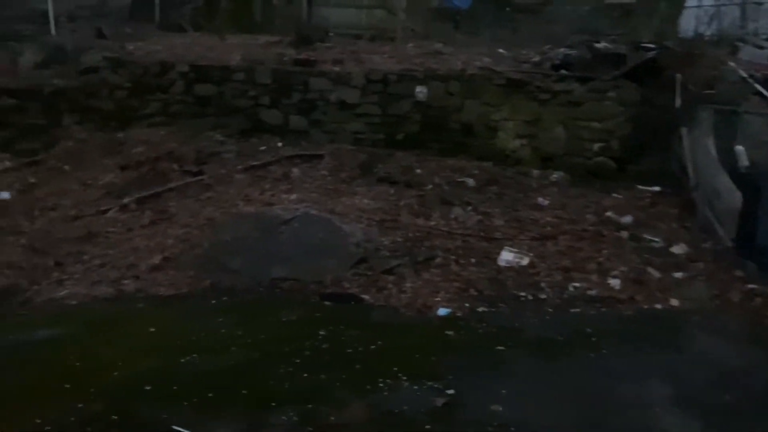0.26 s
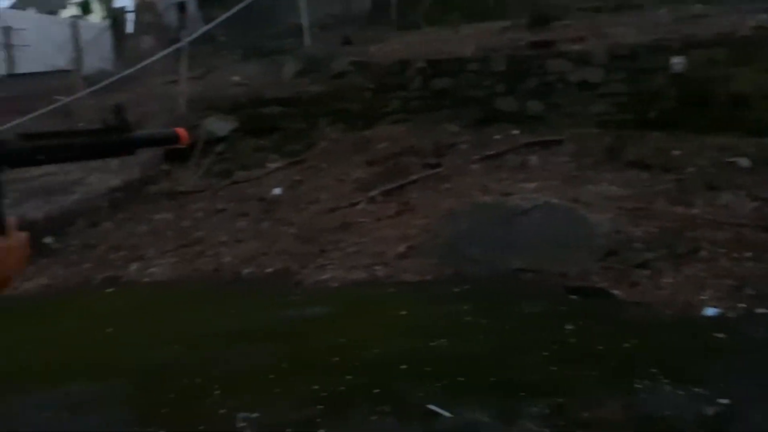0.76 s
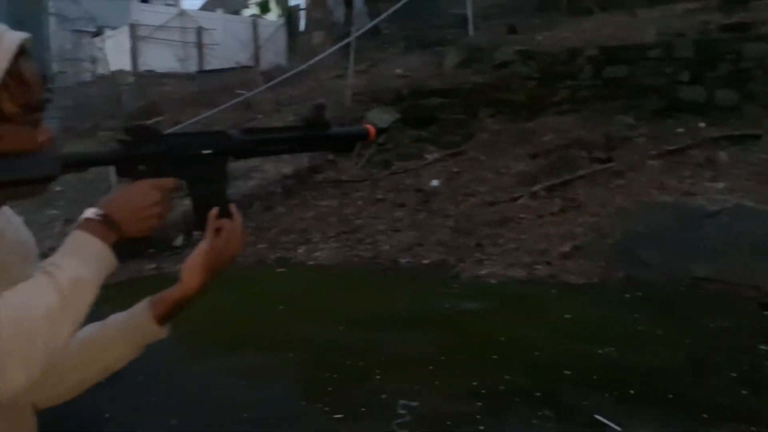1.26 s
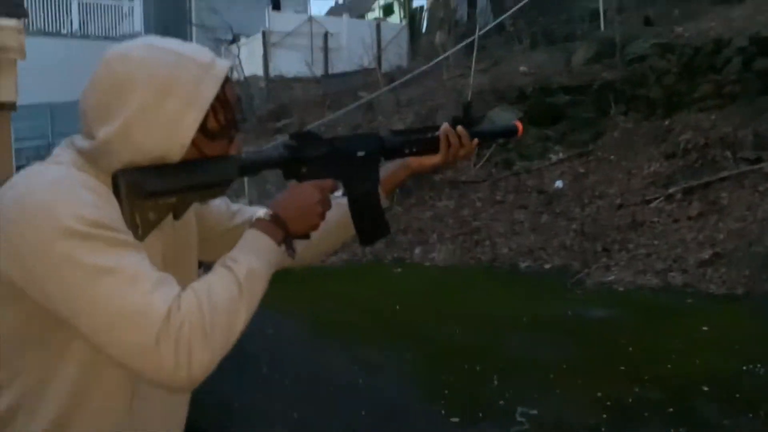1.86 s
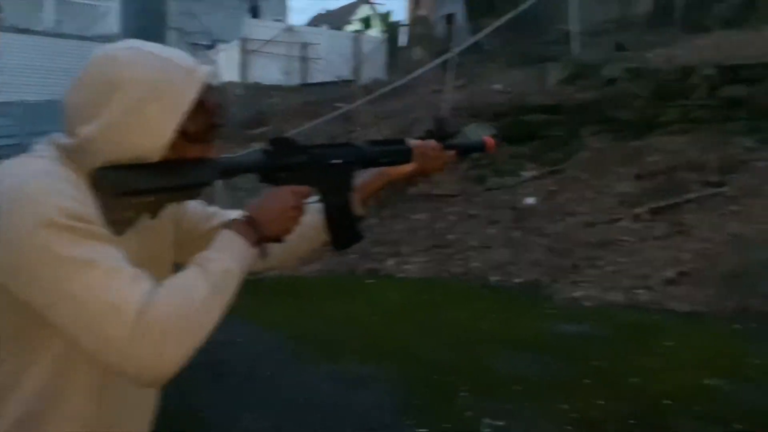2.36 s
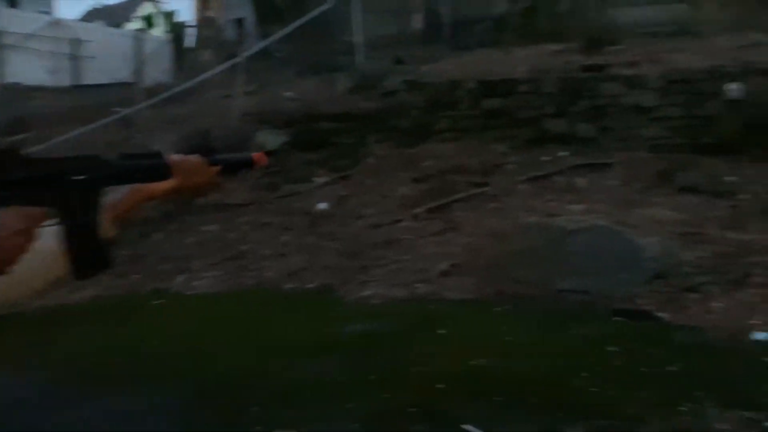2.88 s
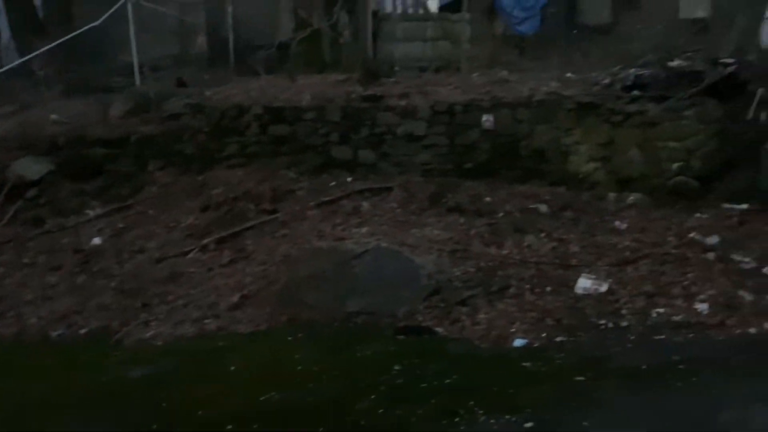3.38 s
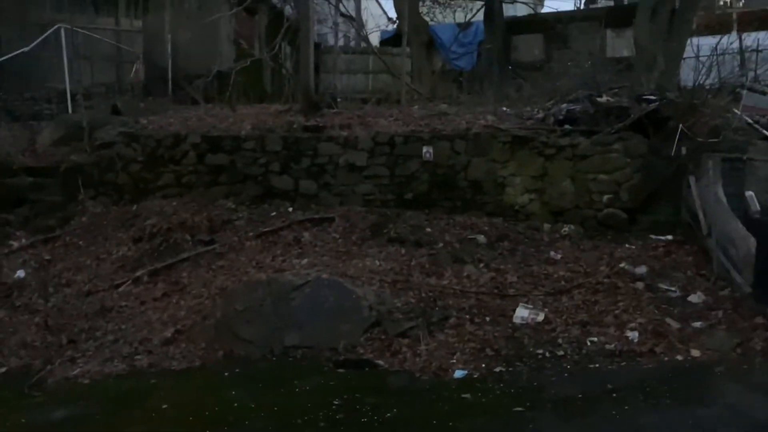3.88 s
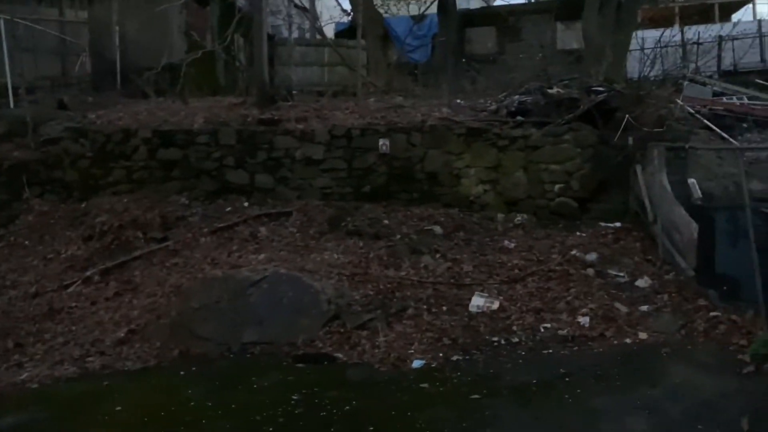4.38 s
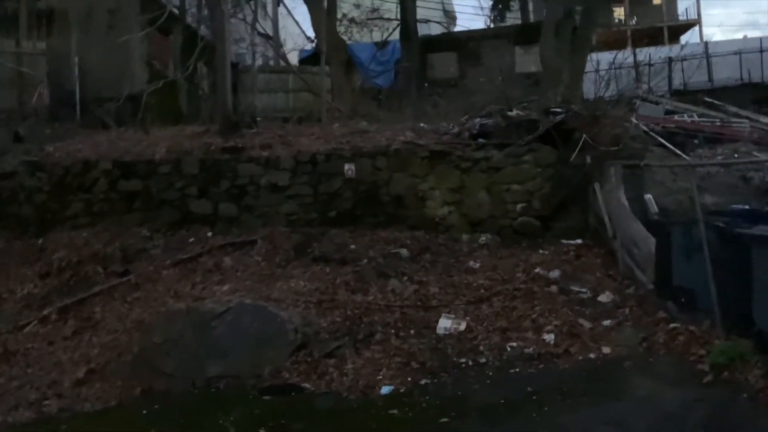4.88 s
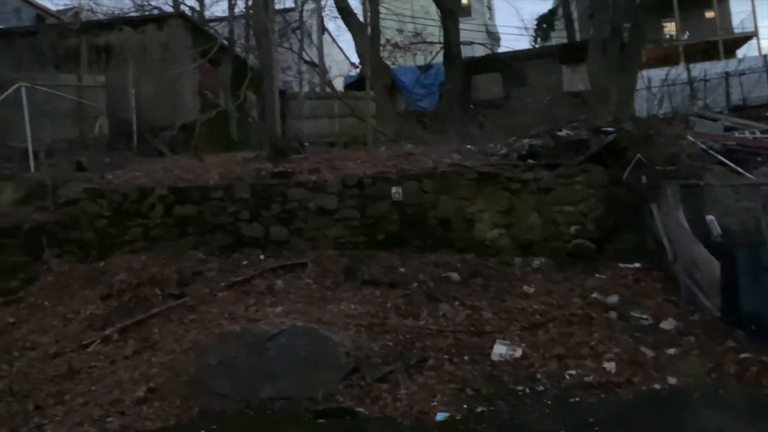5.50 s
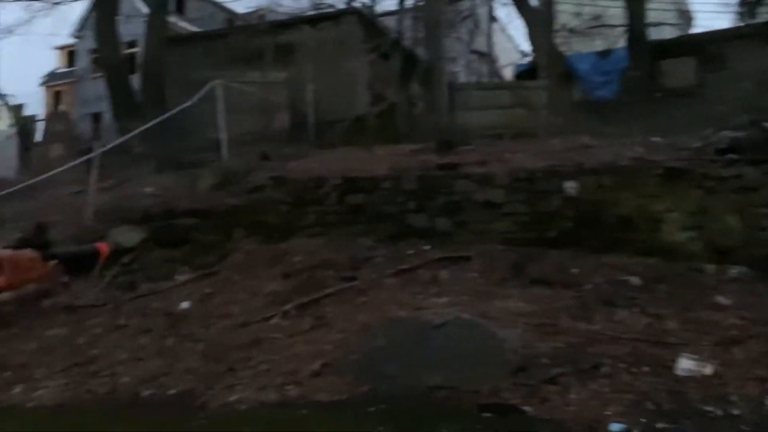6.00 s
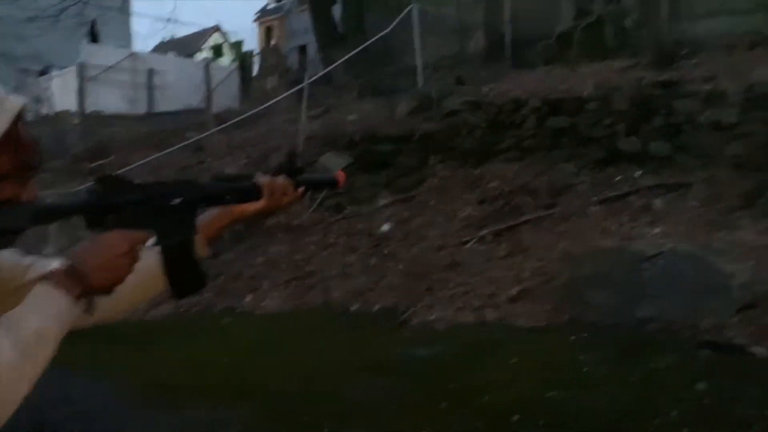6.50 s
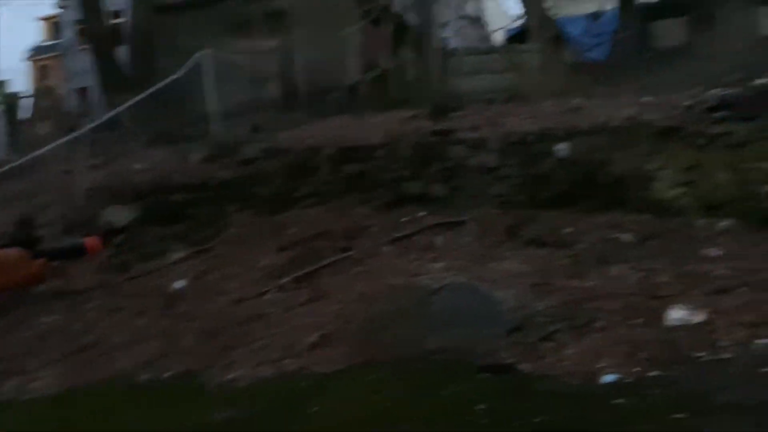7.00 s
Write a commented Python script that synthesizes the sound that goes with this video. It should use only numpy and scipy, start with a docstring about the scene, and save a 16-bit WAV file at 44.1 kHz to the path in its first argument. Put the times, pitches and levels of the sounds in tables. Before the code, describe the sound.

A close outdoor scene in a small yard, with faint low town rumble and light wind fluttering on the microphone. From about 0.1 to 1.4 seconds a magazine wheel is wound in four quick strokes, at roughly 0.1, 0.5, 0.85 and 1.2, each six to eight bright plastic clicks with a small shell ring, the last ending in a faint thud. A sleeve rustles softly near 1.7-1.9, and muffled bumps hit the microphone until 2.3. Five single shots follow at about 2.6, 2.8, 3.0, 3.2 and 3.4: short gear whir, hard clack, air puff, pellet tick about a tenth of a second later. Dull knocks and skittering ticks trail from 3.5 to 4.2. Quiet breeze remains, with a barely audible thin whistle and chirp around 5.5-5.8. At 6.14 the motor whirs again and three shots rattle out between 6.25 and 6.47, with brief reverberation, then calm to 7.2.

```python
"""An electric airsoft rifle in a back yard, a step from the microphone, in light wind before a distant town.
First a ratchet wheel on the magazine is wound in four strokes: tooth impacts ring its shell.
Handling then bumps the microphone, heard as damped low modes, and a sleeve rustles as filtered noise.
Five single shots follow, and later a burst of three: meshing gears whir and draw the spring, the piston
slams and air puffs out as noise bursts and body modes, and pellets tick on the far bank."""
import sys
import numpy as np
from scipy import signal
from scipy.fft import rfft, irfft, next_fast_len
from scipy.io import wavfile
from scipy.ndimage import uniform_filter1d

SR = 44100
rng = np.random.default_rng(int(sys.argv[2]) if len(sys.argv) > 2 else 0)


def wav_record(signal):
    """Record a signal, one row per channel, as 16-bit PCM in the file named by sys.argv[1]."""
    frames = np.transpose(np.atleast_2d(signal))
    bounded = np.clip(frames, -1, 1)
    # unit amplitude maps onto the largest positive 16-bit level
    quanta = np.round(bounded * 32767).astype(np.int16)
    wavfile.write(sys.argv[1], SR, quanta)


N = 319725
T = np.arange(N) / SR
SIZE = next_fast_len(N + SR)
FREQS = np.fft.rfftfreq(SIZE, 1 / SR)

# Levels in the tables are relative; each source sets its balance with offsets in dB.
# soft bumps on the microphone: t/s, level/dB
BUMPS = [(1.896, -34.5), (1.966, -25), (1.998, -31), (2.029, -31.5), (2.074, -24), (2.093, -22),
         (2.17, -28), (2.223, -24), (2.279, -29), (4.152, -31), (4.175, -33.5)]
# trigger pulls: motor on t/s, motor off t/s, run-up mesh f/Hz, rattle level/dB up to the first shot,
# rattle level/dB after it, motor tone level/dB under load, trigger click level/dB
PULLS = [(2.574, 2.682, 2150, -26.5, -27, -40.5, -23.5), (2.737, 2.865, 2051, -29.5, -28, -35.5, -23),
         (2.921, 3.063, 2168, -27, -32, -24.5, -26), (3.121, 3.268, 2202, -24, -35.5, -36.5, -42),
         (3.283, 3.447, 1829, -26.5, -30, -53.5, -42), (6.137, 6.513, 1858, -21.5, -22.5, -43.5, -35)]
# shots: t/s, clack level/dB, puff level/dB, piston travel/s, latch chatter level/dB, pellet strike level/dB
SHOTS = [(2.6254, -10, -8, 0.0051, -26.5, -43.5), (2.808, -8.5, -16, 0.0067, -29.5, -18.5),
         (3.0170, -9.5, -17.5, 0.0068, -34, -18.5), (3.2316, -10, -19, 0.0058, -34, -15.5),
         (3.4069, -9.5, -18.5, 0.0064, -31.5, -15), (6.2530, -9, -12.5, .0058, -19.5, -16.5),
         (6.3630, -11, -14.5, 0.0063, -22, -18), (6.4709, -10.5, -15.5, 0.008, -32.5, -7.5)]
# spectra of the spring's rasp, a pellet's tick and a dull knock: f/Hz, level/dB per Hz
SPRING_COLOUR = [(2000, -25.5), (5000, -11.5), (7500, -10), (9500, 8), (10500, 3.5), (12000, 7),
                 (14000, -7.5), (15800, -18.5)]
PELLET_COLOUR = [(500, -17.5), (2000, -12.5), (4500, -12.5), (7000, -11.5), (9500, -2.5), (11000, -4.5),
                 (13000, -2.5), (15800, -7.5)]
KNOCK_COLOUR = [(200, -7), (1000, -0.5), (1800, -1.5), (3500, -6), (5200, -2), (8000, -11), (15000, -23.5)]


def from_db(db):
    """Decibels are logarithmic: 20 dB is a factor of ten in amplitude."""
    return 10 ** (np.asarray(db) / 20)


def level_in_time(rows):
    """Linear interpolation of (t/s, level/dB) rows at every sample."""
    s, db = np.transpose(rows)
    return np.interp(T, s, db)


def at_hz(points, hz, axis=1):
    """Linear interpolation of one column on a logarithmic frequency axis."""
    points = np.array(points)
    return np.interp(np.log(np.maximum(hz, 1)), np.log(points[:, 0]), points[:, axis])


def noise():
    """White noise has a flat spectrum; here the two ports are uncorrelated."""
    return rng.standard_normal((2, N))


def wobble(rate):
    """Random modulation: normal values of unit spread, `rate` a second, joined by straight lines."""
    knots = np.arange(0, N / SR + 1, 1 / rate)
    return np.interp(T, knots, rng.standard_normal(len(knots)))


def colour(x, spectrum):
    """Minimum-phase filtering by a folded cepstrum: causal, and keeps the power of white noise."""
    gain = from_db(at_hz(spectrum, FREQS))
    gain /= np.sqrt(np.mean(gain ** 2))
    cepstrum = irfft(np.log(gain), SIZE)
    cepstrum[1:SIZE // 2] *= 2
    cepstrum[SIZE // 2 + 1:] = 0
    response = np.exp(rfft(cepstrum))
    return irfft(rfft(x, SIZE) * response, SIZE)[:, :N]


def bursts(times, levels_db, t60, rise):
    """Impact noise: power adds over contacts, each swelling over `rise` seconds and decaying exponentially."""
    power = np.zeros(N)
    age = T[:SR // 2]
    for s, db, fade in zip(times, levels_db, np.broadcast_to(t60, len(times))):
        envelope = from_db(db - 60 * age / fade) * (1 - np.exp(-age / rise))
        room = power[round(s * SR):][:len(age)]
        room += envelope[:len(room)] ** 2
    return np.sqrt(power) * noise()


def struck(times, levels_db, modes, scatter_db):
    """Modal synthesis: each blow excites every damped resonance with a strength of its own."""
    out = np.zeros(N)
    at = np.round(np.asarray(times) * SR).astype(int)
    chance = rng.standard_normal((len(at), len(modes)))
    for k, (hz, db, t60) in enumerate(modes):
        clicks = np.full(N, 1e-18)  # the tiny floor avoids denormal numbers
        sign = (-1) ** k
        clicks[at] = from_db(levels_db + db + scatter_db * chance[:, k]) * sign
        r = np.exp(-np.log(1000) / (t60 * SR))
        w = 2 * np.pi * hz / SR
        out += signal.lfilter([0, np.sin(w)], [1, -2 * r * np.cos(w), r * r], clicks)
    return out


def swells(rows):
    """Power addition of Gaussian swells, each given as (t/s, peak level/dB, spread/s)."""
    return sum((from_db(db) * np.exp(-((T - s) / spread) ** 2 / 2)) ** 2 for s, db, spread in rows)


def yard(x, wet_db, build):
    """Reverberation: walls, bank and fences scatter the sound back, decaying at a rate set by frequency."""
    # decay of the yard: f/Hz, t60/s
    decay = [(300, 0.43), (1000, 0.42), (3000, 0.54), (6000, 0.45), (12000, 0.09)]
    age = T[:SR]
    edges = [120, 500, 1500, 4000, 8000, 17000]  # Hz
    echo = 0
    for low, high in zip(edges, edges[1:]):
        band_pass = signal.butter(2, [low, high], "band", fs=SR, output="sos")
        band = signal.sosfilt(band_pass, rng.standard_normal((2, SR)))
        t60 = at_hz(decay, np.sqrt(low * high))
        echo = echo + band * np.exp(-np.log(1000) * age / t60)
    echo *= 1 - np.exp(-age / build)
    echo *= from_db(wet_db) / np.sqrt(np.sum(echo ** 2) / 2)
    return x + signal.fftconvolve(x, echo, axes=1)[:, :N]


def town():
    """Broadband background: filtered noise of slowly changing level stands for the far town."""
    # level: t/s, level/dB
    levels = [(0, -61.5), (1.9, -56.5), (2.5, -58.5), (4.4, -59), (5.5, -58), (7.25, -57.5)]
    # spectrum: f/Hz, level/dB per Hz
    spectrum = [(88, -47.5), (150, -4.5), (303, -5.5), (494, -10), (871, -9), (1630, -18.5), (2650, -30.5),
                (3040, -37), (3290, -37), (4580, -41.5), (5250, -48), (6770, -44), (8560, -50),
                (11300, -44.5), (16000, -57)]
    return colour(noise(), spectrum) * from_db(level_in_time(levels) + 2)


def wind():
    """Flow noise at the microphone: a wavering breeze, gusts, and a swell after each shot and bump."""
    # gusts: t/s, peak level/dB, spread/s
    gusts = [(0.21, -37.5, 0.036), (0.54, -37.5, 0.095), (0.875, -32.5, 0.018), (1.08, -36.5, 0.029),
             (1.72, -34.5, .07), (2.1, -35, .03), (2.39, -32.5, .03), (3.99, -36, 0.036),
             (4.56, -36, 0.027), (5.12, -36.5, 0.042), (5.69, -32, 0.022), (6.87, -39, .05)]
    # spectrum: f/Hz, level/dB per Hz
    spectrum = [(15, -19), (30, -16.5), (55, 3.5), (85, 4.5), (125, -5), (200, -22), (400, -28.5),
                (2000, -79)]
    breeze = from_db(-45.5 + 1.5 * wobble(7.7))
    # levels against the puff of a shot and the table level of a bump
    draughts = [(s + 0.0075, puff_db - 19, .015) for s, _, puff_db, *_ in SHOTS]
    jolts = [(s + 0.017, db - 4, .02) for s, db in BUMPS]
    rumble = colour(noise(), spectrum)
    # divide by the running power so that the envelope alone sets the level
    running_power = uniform_filter1d(rumble ** 2, size=3000, axis=1)
    wanted_power = breeze ** 2 + swells(gusts + draughts + jolts)
    return rumble * np.sqrt(wanted_power / running_power)


def stroke_teeth(start, length, speed_up, slowing, snap_db, ring_db, count):
    """Uneven rotation: the thumb gathers speed and slows; rows of (t/s, snap level/dB, ring level/dB)."""
    turned = np.linspace(0, 1, count)
    bend = turned * (1 - turned) * (speed_up * (1 - 2 * turned) - slowing)
    s = start + length * (turned + bend)
    scatter_db = 1.15 * rng.standard_normal((count, 2))
    return np.column_stack([s, [snap_db, ring_db] + scatter_db])


def ratchet():
    """Impact excitation: the pawl snaps over each tooth and rings the shell; the ground returns the snap."""
    # thumb strokes: first tooth t/s, length/s, teeth, speed-up in mid-stroke, slowing towards the end,
    # snap level/dB, shell ring level/dB
    strokes = [(0.072, .1031, 6, .08, .13, -27.5, -40), (0.471, .152, 7, .65, .49, -25, -44),
               (0.8495, .1535, 6, .62, .25, -23, -41.5), (1.2226, .1255, 8, .53, -.15, -23.5, -42)]
    # modes of the magazine shell: f/Hz, level/dB, t60/s
    shell_modes = [(879, -16.5, 0.12), (1026, -15, 0.079), (2670, -16.5, 0.056), (3870, -9.5, 0.038),
                   (4040, -4, 0.037), (4320, -3.5, .025), (4430, -11, 0.045), (5660, -8, 0.026),
                   (8040, -7, 0.021)]
    # spectrum of a snap: f/Hz, level/dB per Hz
    snap_colour = [(300, -26), (900, 5), (1500, -3), (2700, 8), (3300, 2.5), (4300, 5.5), (6300, -4),
                   (8000, 10.5), (11000, 7), (13000, 6), (15800, 5)]
    shaken_colour = [(2000, -25), (3600, -15), (4400, 0), (5100, -20.5), (5700, -8.5), (9000, -20.5)]
    teeth = [stroke_teeth(start, length, *manner, count=round(count))
             for start, length, count, *manner in strokes]
    s, db, ring_db = np.vstack(teeth).T
    snap = bursts(s + 0.00031, db + 2.5, t60=0.013, rise=0.0016)
    ground = bursts(s + 0.0043, db - 18, t60=0.08, rise=0.0022)
    shell = struck(s + 0.001005, ring_db + 4.0, shell_modes, scatter_db=3.5) * [[1], [.7]]
    # loose pellets inside are shaken by each snap
    shaken = bursts(s + 0.00069, ring_db - 1, t60=0.087, rise=0.0031)
    return colour(snap + ground, snap_colour) + shell + colour(shaken, shaken_colour)


def knocks():
    """Dull contact noise: the first thud ends the last ratchet stroke; the others fall among the shots."""
    # knocks: t/s, level/dB
    thuds = [(1.369, -37), (3.541, -13.5), (3.689, -23), (3.9462, -21)]
    s, db = np.transpose(thuds)
    return colour(bursts(s, db - 7.5, t60=.035, rise=0.0057), KNOCK_COLOUR)


def sleeve():
    """Friction noise: cloth rustles as the arms move, its level fluctuating at random."""
    # rustles: t/s, peak level/dB, spread/s
    rustles = [(1.675, -64, 0.048), (1.842, -62.5, 0.012), (1.91, -63, 0.028), (4.62, -74.5, 0.023)]
    cloth_colour = [(800, -5.5), (2500, 4), (5500, 2.5), (8000, -3), (15000, -9.0)]
    envelope = np.sqrt(swells(rustles)) * from_db(3.1 * wobble(120))
    return colour(noise() * envelope, cloth_colour)


def microphone_bumps():
    """Structure-borne impact: low contact noise and the damped modes of the microphone housing."""
    # housing modes: f/Hz, level/dB, t60/s
    housing_modes = [(85, -9.5, 0.26), (129, -3, 0.21), (184, -6.5, 0.15), (340, -21, 0.055)]
    # spectra of a soft bump and of a firmer knock: f/Hz, level/dB per Hz
    soft_colour = [(25, -16.5), (70, -20), (120, 0.5), (200, -12.5), (400, -16.5), (700, -35.5),
                   (2000, -52), (8000, -80.5)]
    hard_colour = [(100, -7), (300, 1), (650, -3), (1000, -26), (4000, -60)]
    s, db = np.transpose(BUMPS)
    soft = colour(bursts(s, db - 2, t60=0.076, rise=0.0053), soft_colour)
    thump = struck(s + 0.0031, db + 1.5, housing_modes, scatter_db=4.0)
    hard = colour(bursts([2.226], [-30.5], t60=0.053, rise=.002), hard_colour)
    return soft + thump + hard


def trigger():
    """Contact noise: the trigger clicks and the gears take up their slack with a small knock."""
    s, *_, db = np.transpose(PULLS)
    click = bursts(s + 0.0022, db, t60=0.023, rise=.0003)
    slack = bursts(s, db - 10.5, t60=.035, rise=0.0055)
    return colour(click, PELLET_COLOUR) + colour(slack, KNOCK_COLOUR)


def drive():
    """Motor under load: it runs up, labours against the spring, recovers after the shot and coasts.

    Returns mesh f/Hz, rattle level/dB and motor tone gain.
    """
    free_mesh_hz, run_up_power = 2114, .36  # unloaded gears; speed grows as a power of time
    coast_s, coast_db_per_s = .07, 420  # time constant of the speed and fading of the rattle, motor off
    draw_s, spring_sag = .068, .43  # drawing the spring takes this long and this share of the speed
    recover_s = .011  # time constant once the spring is let go
    rattle_per_speed = 1.2  # rattle grows as this power of the run-up
    shot_s = np.array(SHOTS)[:, 0]
    load, strain = np.zeros((2, N))
    for s in shot_s:
        drawn = np.clip(1 + (T - s) / draw_s, 0, 1)
        load += drawn * np.exp(-np.maximum(T - s, 0) / recover_s)
        strain += np.sin(np.pi * drawn)
    mesh_hz, rattle_db, tone = np.zeros(N), np.full(N, -140.), np.zeros(N)
    for on, off, run_up_hz, before_db, after_db, tone_db, _ in PULLS:
        live = T > on
        first_shot = shot_s[shot_s > on][0]
        t = T[live]
        run_up = np.minimum((t - on) / (first_shot - on), 1) ** run_up_power
        freed = 1 - np.exp(-np.maximum(t - first_shot, 0) / recover_s)
        coasting = np.maximum(t - off, 0)
        full_hz = run_up_hz + freed * (free_mesh_hz - run_up_hz)
        mesh_hz[live] = full_hz * run_up * np.exp(-coasting / coast_s)
        growth_db = rattle_per_speed * 20 * np.log10(run_up)
        steady_db = before_db + freed * (after_db - before_db)
        rattle_db[live] = steady_db + growth_db - coast_db_per_s * coasting
        tone[live] = from_db(tone_db) * run_up
    loaded_hz = mesh_hz * (1 - np.clip(spring_sag * load, 0, 1))
    hum = from_db(rattle_db - 24.5)
    return loaded_hz, rattle_db, tone * strain + hum


def casing(x, ring_t60, ring_db):
    """Dense modal response: the metal shell adds a brief ring of many close resonances."""
    age = T[:SR // 20]
    ring = rng.standard_normal((2, len(age))) * np.exp(-np.log(1000) * age / ring_t60)
    ring *= from_db(ring_db) / np.sqrt(np.sum(ring ** 2) / 2)
    ringing = x + signal.fftconvolve(x, ring, axes=1)[:, :N]
    return ringing / np.hypot(1, from_db(ring_db))


def gearbox():
    """Periodic excitation: teeth rattle the casing once per mesh and whine; the spring rasps more with speed."""
    # gear tones ahead of the casing: multiple of the mesh rate, level/dB against the rattle
    orders = [(0.802, -20), (0.998, -15), (1.4, -22), (1.999, -12.5), (2.198, -19), (2.6, -21),
              (2.998, -14), (3.402, -19.5), (4, -29.5), (5.002, -15), (5.998, -21.5)]
    # spectrum of the gears: f/Hz, level/dB per Hz
    gear_colour = [(150, -21), (400, -3.5), (650, -5.5), (920, 7.5), (1350, -11.5), (2050, 3.5),
                   (2400, -3.5), (2800, 3), (3200, -3.5), (4150, 2), (5000, -0.5), (6500, -0.5),
                   (8000, -11), (15800, -8.5)]
    mesh_hz, rattle_db, motor_gain = drive()
    trembling_hz = mesh_hz * (1 + 0.0171 * wobble(300))
    turn = 2 * np.pi * np.cumsum(trembling_hz) / SR
    teeth = np.exp(1.4 * np.cos(turn)) * from_db(0.92 * wobble(500))
    teeth /= np.sqrt(np.mean(teeth ** 2))
    # uneven teeth give side tones that come and go
    whine = 0
    for k, (order, db) in enumerate(orders):
        port_phase = [[0], [k]]
        whine = whine + from_db(db + 4.5 * wobble(65)) * np.sin(order * turn + port_phase)
    rattle = colour((noise() * teeth + whine) * from_db(rattle_db - 2.5), gear_colour)
    rasp_gain = from_db(rattle_db - 9.5) * (mesh_hz / 1800) ** 1.3
    rasp = colour(noise() * teeth * rasp_gain, SPRING_COLOUR)
    motor = motor_gain * from_db(2 * wobble(160)) * np.sin(3 / 5 * turn)
    mesh_tone = from_db(rattle_db - 22 + 3.5 * wobble(120)) * np.sin(turn)
    return casing(rattle + rasp, ring_t60=0.032, ring_db=1.5) + (motor + mesh_tone) * [[1.3], [.7]]


def shots():
    """Released spring energy: a soft hiss swells into each shot, the piston slams, air puffs, the latch chatters."""
    # modes of the barrel and hollow receiver: f/Hz, level/dB
    body_modes = [(165, -13), (365, -4), (500, -4.5), (850, -6), (980, -6.5), (1145, -8.5), (1525, -8.5),
                  (2060, -13.5)]
    # spectra of the clack and of the air leaving the muzzle: f/Hz, level/dB per Hz
    clack_colour = [(150, -13.5), (700, -3.5), (2000, -9), (3000, -3), (4200, 3), (5700, 5), (6800, 0.5),
                    (8500, -1.5), (11500, -4), (13500, -7.5), (15800, -13)]
    puff_colour = [(25, -28), (70, -18), (150, 5), (240, -12.5), (370, -2.5), (650, -13.5), (850, 2),
                   (1100, -3), (1400, -10), (2000, -4), (3000, -20), (6000, -26.5)]
    body_t60, latch_delay_s = .033, 0.042
    s, clack_db, puff_db, travel, latch_db, _ = np.transpose(SHOTS)
    swell_in = bursts(s - .012, clack_db - 4, t60=.07, rise=.009)
    release = bursts(s - .0004, clack_db + 8, t60=.016, rise=.0016)
    slam = bursts(s + travel, clack_db + 4, t60=.01, rise=.0006)
    shudder = bursts(s + .002, clack_db - 15, t60=0.12, rise=0.0043)
    clack = colour(swell_in + release + slam + shudder, clack_colour)
    latch = bursts(s + latch_delay_s, latch_db - 0.5, t60=0.18, rise=.0012)
    body = [(hz, db, body_t60) for hz, db in body_modes]
    puff = struck(s + 0.0033, puff_db, body, scatter_db=0.5)
    # the ground returns the puff a few milliseconds later
    puff += struck(s + 0.0096, puff_db - 7.0, body, scatter_db=5.0)
    air = colour(bursts(s + 0.0013, puff_db + 0.5, t60=0.047, rise=0.0018), puff_colour)
    return clack + colour(latch, SPRING_COLOUR) + puff * [[1], [.4]] + air


def pellets():
    """Brief contact noise: each pellet ticks on the bank after its flight; strays skitter."""
    # stray pellets and ricochets: t/s, level/dB, t60/s
    strays = [(3.611, -23, 0.0089), (3.718, -22.5, 0.025), (3.864, -43, 0.015), (3.942, -30.5, 0.13),
              (4.1743, -44.5, 0.062), (4.3993, -54, 0.021), (5.3185, -59, 0.019), (5.54, -41, 0.14),
              (6.081, -54.5, .02), (6.671, -34, 0.015), (6.7730, -41.5, .07), (6.973, -56.5, 0.054)]
    flight_s = .0974
    shot_s, *_, strike_db = np.transpose(SHOTS)
    s, db, t60 = np.transpose(strays)
    strikes = bursts(shot_s + flight_s, strike_db - 2.5, t60=0.0086, rise=0.00031)
    skitter = bursts(s, db - 2.5, t60, rise=0.00028)
    return colour(strikes + skitter, PELLET_COLOUR)


def thin_tone(levels, hz):
    """Frequency modulation: a faint sine whose level and pitch are slightly unsteady."""
    phase = 2 * np.pi * np.cumsum(hz + 14 * wobble(60)) / SR
    return from_db(level_in_time(levels) + 2.3 * wobble(30)) * np.sin(phase)


def far_whistles():
    """Nearly pure tones: a thin far whistle and a brief lower chirp."""
    # levels of the whistle and of the chirp: t/s, level/dB
    whistle_levels = [(4.95, -110), (5.1, -86.5), (5.52, -75), (5.56, -110), (6.75, -110), (6.86, -85),
                      (7.25, -80)]
    chirp_levels = [(5.58, -105), (5.66, -75.5), (5.74, -74), (5.86, -105)]
    return thin_tone(whistle_levels, hz=6660) + thin_tone(chirp_levels, hz=3200)


def scene():
    """Superposition: rifle and pellets reverberate in the yard; the air and the town are added dry."""
    winding = yard(ratchet(), wet_db=-17.0, build=0.0015)
    firing = yard(trigger() + gearbox() + shots(), wet_db=-14.5, build=0.0074)
    impacts = yard(knocks() + pellets(), wet_db=-9.0, build=.01)
    surroundings = town() + wind() + sleeve() + microphone_bumps() + far_whistles()
    return winding + firing + impacts + surroundings


def record(dry):
    """Coherence of two close ports: they share part of the sound, the treble most, with a phase lag."""
    # microphone pair: f/Hz, likeness (0-1), left minus right level/dB
    ports = [(59.6, 0.91, -1.5), (148, 0, -2), (378, 0.5, 0.5), (850, 0.3, 3), (1500, 0.5, -0.5),
             (2020, 0.18, -1), (3500, 0.4, -1), (5330, 0, -4.5), (6560, 0.3, 0)]
    # likeness in the treble: f/Hz, likeness (0-1)
    treble_likeness = [(8200, .995), (8900, .995), (10000, .88), (12200, .9), (13100, .995), (13900, .995),
                       (15000, .88)]
    # phase between the ports: f/Hz, left lead/rad
    port_phase = [(70, 0), (140, 2.4), (300, 0), (850, .8), (1500, 1.2), (2100, 2.6), (3500, 2), (5700, .5),
                  (7000, -.9), (8550, -np.pi), (11000, -2 * np.pi), (13400, -3 * np.pi), (15800, -12.3)]
    cutoff_hz = 16100
    left, right = rfft(dry, SIZE)
    likeness = [row[:2] for row in ports] + treble_likeness
    alike = np.clip(at_hz(likeness, FREQS), 0, 1)
    right = alike * left + np.sqrt(1 - alike ** 2) * right
    right = right * np.exp(-1j * at_hz(port_phase, FREQS))
    lean = from_db(at_hz(ports, FREQS, axis=2) / 2)
    pair = irfft(np.array([left * lean, right / lean]), SIZE)[:, :N]
    low_pass = signal.ellip(10, .2, 80, cutoff_hz, fs=SR, output="sos")
    return signal.sosfilt(low_pass, np.clip(pair, -1, 1))


dry = scene()
out = record(dry)
wav_record(out)
```